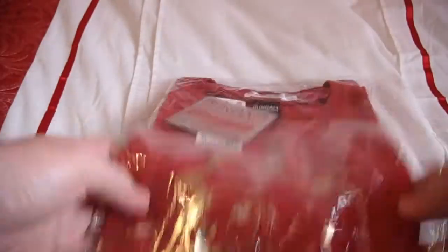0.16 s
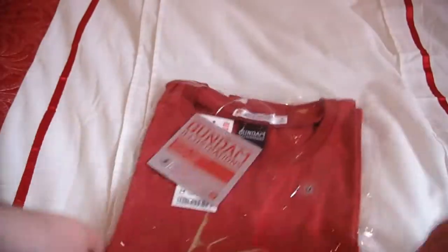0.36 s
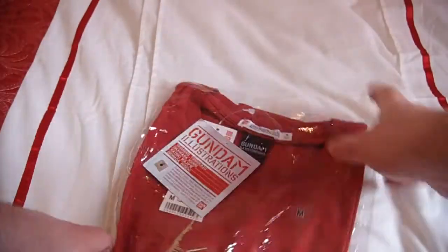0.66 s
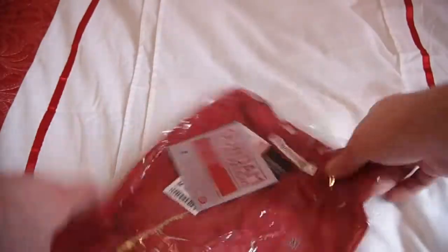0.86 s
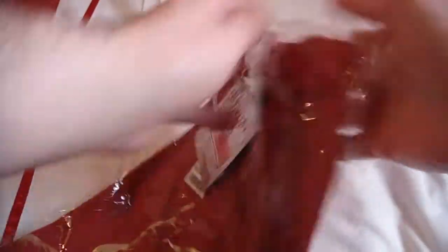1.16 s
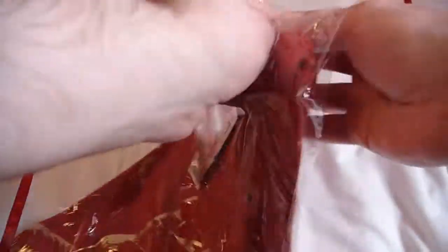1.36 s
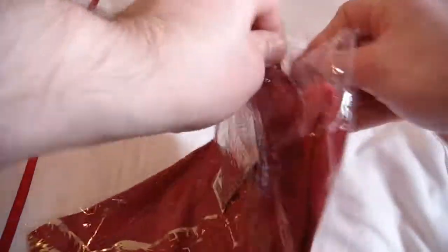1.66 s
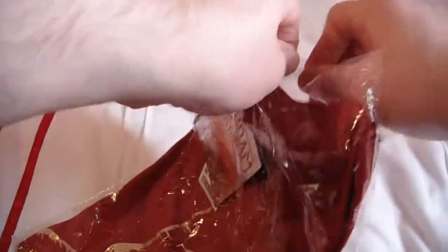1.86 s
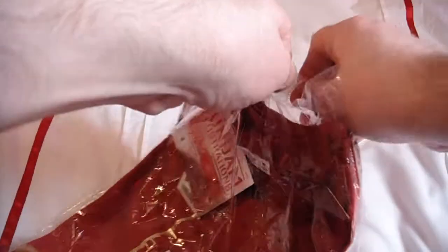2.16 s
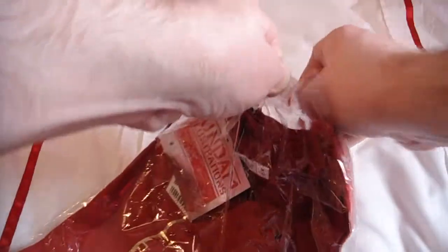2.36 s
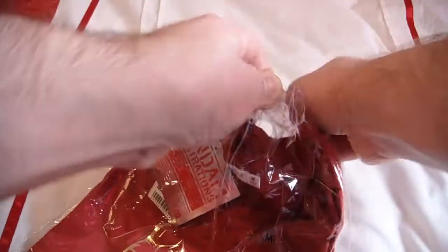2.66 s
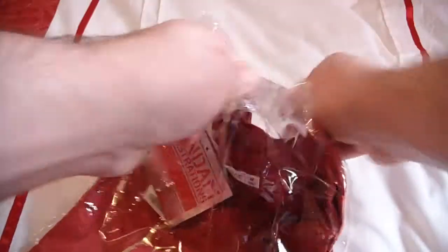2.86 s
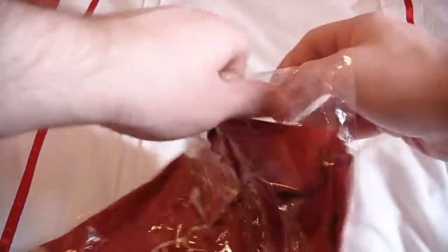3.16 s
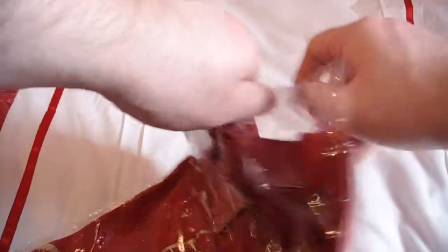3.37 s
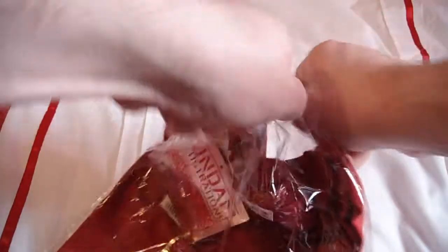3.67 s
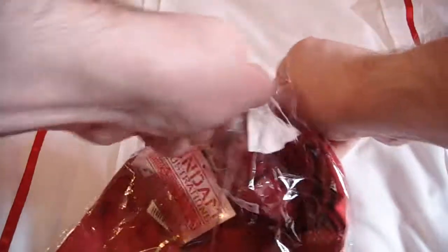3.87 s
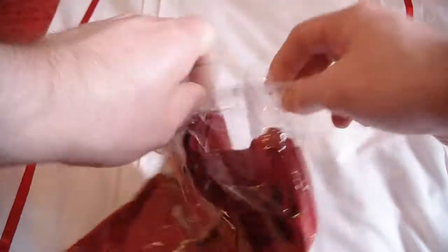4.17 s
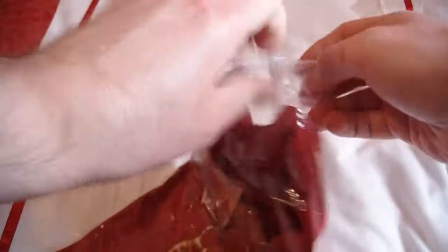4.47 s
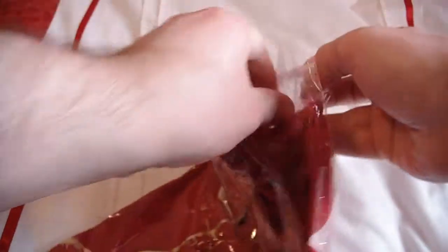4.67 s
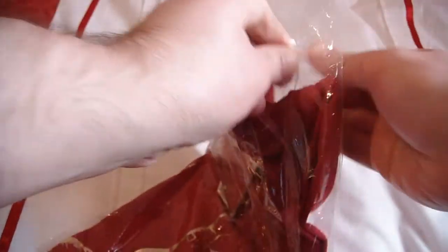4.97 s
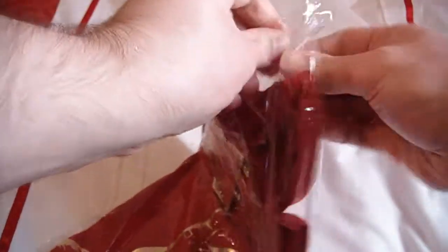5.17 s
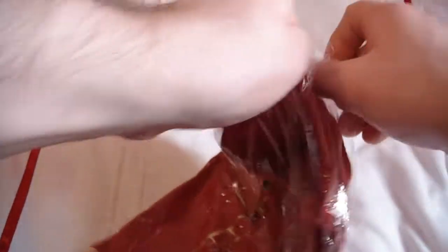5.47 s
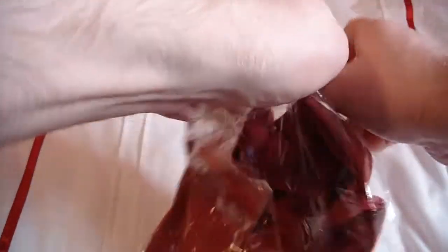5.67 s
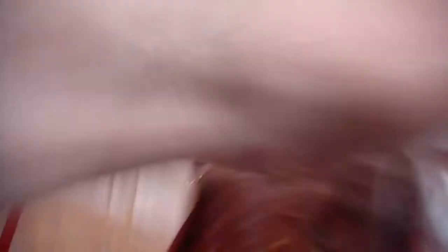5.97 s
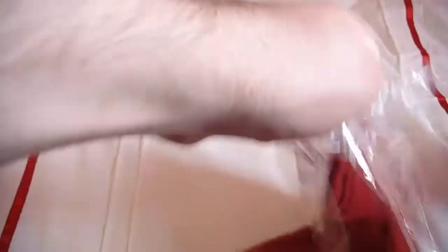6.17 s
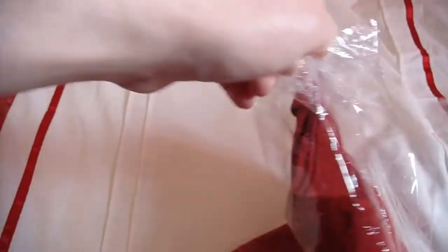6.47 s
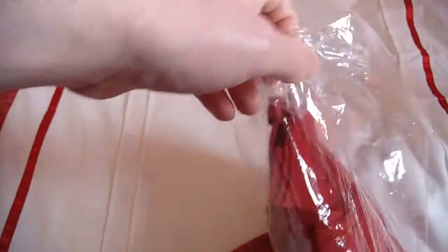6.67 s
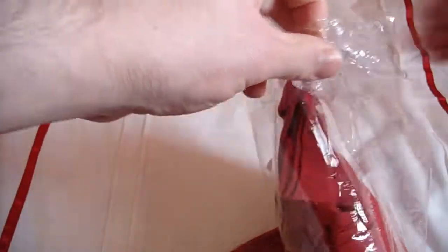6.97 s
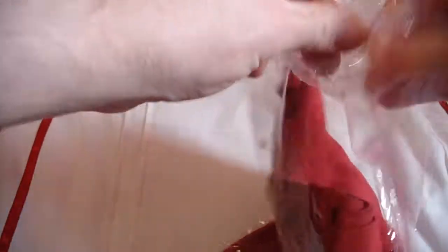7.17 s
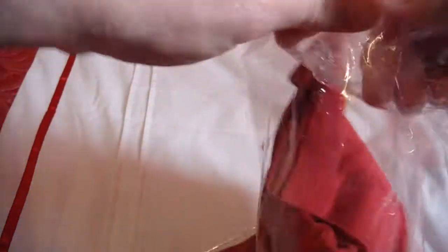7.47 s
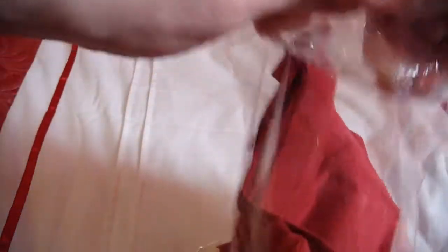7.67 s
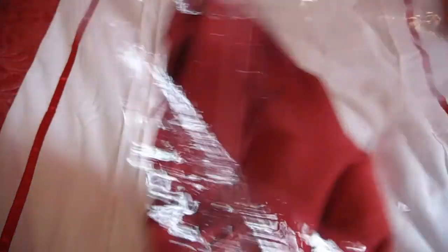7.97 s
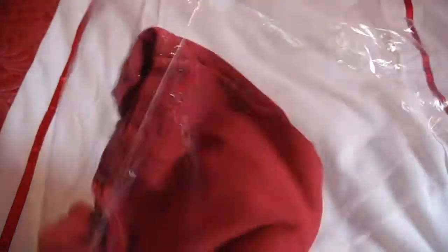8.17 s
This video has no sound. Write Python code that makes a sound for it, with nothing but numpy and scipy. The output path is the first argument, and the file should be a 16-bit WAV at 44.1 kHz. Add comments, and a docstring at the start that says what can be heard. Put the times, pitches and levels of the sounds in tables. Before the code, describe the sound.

Very close to a stereo microphone in a quiet, dampened room, hands work a thin plastic bag. Short pulls bring dense bright crackle over a sliding hiss, with sharp snaps between. Pops and crumpling knocks join in; the seam rips quickly near six seconds and again before eight, then the loose film rustles loudly with a faint puff of air.

```python
"""Two hands pull at a thin plastic bag on a bed, close to a small stereo microphone, in a quiet, dead room.
Creases buckle in dense clusters of tiny clicks, over a sliding hiss, with single sharp snaps standing out.
Each pull swells and lets go; bunched folds crumple in like-pitched knocks, slack panels flap softly or pop
with a sinking ring, tugs thump, and the seam rips twice in fast runs of breaks. A puff of air passes late on.
A short faint tail and a steady noise floor lie behind; the loudest peaks are flattened at full scale."""
import sys
import numpy as np
from scipy import signal
from scipy.fft import rfft, irfft, next_fast_len
from scipy.io import wavfile
from scipy.ndimage import uniform_filter1d, map_coordinates

SR = 44100
rng = np.random.default_rng(int(sys.argv[2]) if len(sys.argv) > 2 else 0)


def to_wav(s):
    """Save 16-bit WAV."""
    ch = np.atleast_2d(s).T  # columns
    pcm = np.round(np.clip(ch, -1, 1) * 32767)  # PCM
    wavfile.write(sys.argv[1], SR, pcm.astype(np.int16))


N = 366549  # samples

# spectra of the room's noise floor, sliding film, flapping panels and buckling film:
# (frequency [Hz], relative density [dB per Hz])
ROOM_SPECTRUM = [(70, -41.5), (14000, -41.5)]
SLIDE_SPECTRUM = [(200, -17), (780, -7), (1700, 3.5), (14000, -2)]
FLAP_SPECTRUM = [(25, -17.5), (115, -5), (170, -4.5), (250, 0.5), (480, 0), (780, -1), (1800, -1.5),
                 (4000, -45)]
FILM_SPECTRUM = [(130, -46.5), (780, 0), (940, -5), (1900, 0), (4800, 1.5), (9500, 2.5), (14000, 2)]
# tugs that jerk the whole sheet: (time [s], relative level [dB])
TUGS = [(6.298, -17), (6.774, -16.5)]
# bunched folds crumpling: (start [s], length [s], level [dB], middle pitch [Hz])
CRUMPLES = [(1.981, .2, -33, 1400), (4.52, 0.35, -31.5, 1850), (5.554, .1, -27.5, 1890),
            (7.051, 1.0, -30.5, 3440)]
# whole panels popping over: (time [s], starting level [dB], starting pitch [Hz])
POPS = [(.668, -19.5, 768), (0.7825, -8.5, 2100), (2.884, -16, 796), (2.982, -14.5, 800),
        (3.849, -15, 1380), (4.8158, -9.5, 1990), (5.1163, -1, 4270), (5.427, -18.5, 620),
        (5.728, -7.5, 2400), (5.871, -17, 740), (6.4904, -6, 2080), (6.5274, -18.5, 3700),
        (6.5936, -9.5, 6100), (6.9328, -3.5, 3290), (7.033, -23, 463)]
# the seam giving way: (start [s], length [s], relative starting level [dB], fall over the length [dB])
RIPS = [(5.9112, .048, -5, 16.5), (7.776, .024, -1, 32)]
# large single creases snapping through: (time [s], relative level [dB])
SNAPS = [(0.3606, -19), (0.449, -17), (0.48, -19), (0.547, -20), (.5582, -15.5), (0.6296, -14),
         (.9402, -20), (1.0797, -17), (1.3015, -10), (1.407, -10), (1.434, -15), (1.5267, -13),
         (1.5364, -17), (1.7294, -7), (1.7378, -15), (1.8044, -16), (1.8435, -11), (1.853, -12.5),
         (1.925, -15.5), (1.9483, -14.5), (1.9963, -14), (2.017, -29), (2.172, -9.5), (2.191, -14.5),
         (2.22, -18), (2.2487, -16.5), (2.2932, -18), (2.3119, -21.5), (2.3445, -15.5), (2.398, -25),
         (2.4075, -18.5), (2.5375, -6), (2.608, -12), (2.6172, -15.5), (2.7287, -11), (2.833, -13.5),
         (3.1846, -11), (3.197, -21), (3.255, -13), (3.659, -17.5), (3.666, -12), (4.1077, -12.5),
         (4.1366, -17.5), (4.46, -17.5), (4.6224, -17), (4.7412, -19), (5.1533, -13), (5.4443, -14.5),
         (5.6633, -13), (5.8502, -25), (6.2992, -16.5), (6.4383, -17.5), (6.4444, -15.5), (6.5023, -23),
         (6.709, -19), (6.7694, -19), (6.778, -17), (6.7934, -19), (6.9537, -16), (7.1987, -12),
         (7.299, -14), (7.3341, -8.5), (7.344, -10.5)]
# flapping panels under a pull, against the crinkle: (time [s], relative level [dB])
FLAPPING = [(5.1, -23), (5.3, -17.5), (6.05, -12), (6.5, -18), (7.6, -18.5), (7.9, -12.5)]
# how taut the fingers hold the film; taut film gives separate ticks: (time [s], tautness [dB])
TAUTNESS = [(.26, -7), (.42, 1), (1.19, -5), (1.3, 1), (2.45, 3), (3.0, -1), (6.6, 1), (7.05, -3.5),
            (7.9, -6)]
# light crinkle while the bag is only held: (time [s], relative level [dB])
HELD = [(.03, -50), (.18, -34), (.36, -31), (.47, -36), (.65, -31), (.73, -37), (1.0, -27), (2.15, -29),
        (2.3, -37), (2.45, -36), (2.9, -28), (3.7, -30), (6.15, -28), (6.25, -47), (6.3, -32.5),
        (6.88, -36), (7.1, -28), (8.31, -28)]
# separate pulls of the hands:
# (start [s], length [s], relative crinkle level [dB], brightness [dB per two octaves, roughly])
PULLS = [(0.251, .05, -21, 1.5), (.80, .16, -19, -0.5), (1.175, .065, -17.5, 0), (1.305, .05, -21, 0),
         (1.401, .07, -17.5, 2), (1.51, .36, -21, -1.5), (1.981, .2, -25, 0.5), (2.486, .025, -22.5, -7),
         (2.62, .26, -23.5, -0.5), (2.959, .09, -18.5, 0), (3.081, .22, -21.5, 0.5), (3.34, .05, -15, 0),
         (3.41, .14, -21, -0.5), (3.98, .04, -22, -1), (4.025, .03, -18, -2), (4.161, .18, -21.5, 0.5),
         (4.462, .44, -21.5, 1.5), (4.988, .06, -20, -4.5), (5.108, .10, -21.5, -2), (5.249, .07, -16, -3),
         (5.39, .28, -20, -1.5), (5.796, .11, -24, 8.5), (5.998, .06, -21, -1.5), (6.11, .07, -25, -6.5),
         (6.408, .03, -27, 1.5), (6.648, .06, -28, -4), (7.075, .135, -19.5, 2.5), (7.28, .21, -20.5, 4),
         (7.675, .095, -21, 2.5), (7.80, .23, -17.5, 3), (8.21, .04, -19.5, 3)]

ATTACK_S, RELEASE_S = .014, .02  # time constants of taking hold (at tautness 0 dB) and letting go
ATTACK_SLOWS = 2.1  # dB of slower attack per dB of slackness
SAG_DB = 1.5  # the film yields over the length of a pull
HELD_BRIGHT_DB, HELD_FLAP_DB = -4, -13.5  # colour and relative flap level of the held bag
TOP_HZ = 14250  # upper band limit


def amp(db):
    """Amplitude factor of a level in dB."""
    return 10 ** (np.asarray(db) / 20)


def unit(x):
    """x brought to rms 1."""
    return x / np.sqrt(np.mean(x ** 2) + 1e-20)


def curves(rows):
    """One value per sample for each column after the time."""
    times, *columns = np.transpose(rows)
    return [np.interp(np.arange(N) / SR, times, column) for column in columns]


def wobble(rate):
    """A smooth random curve, rate knots a second."""
    knots = rng.standard_normal(int(N * rate / SR) + 4)
    return map_coordinates(knots, [np.arange(N) * rate / SR])


def filtered(x, response):
    """x times a response of frequency."""
    m = next_fast_len(N + SR // 2)
    spectrum = rfft(x, m) * response(np.fft.rfftfreq(m, 1 / SR))
    return irfft(spectrum, m)[..., :N]


def coloured(x, points, size=2048):
    """x through a causal, minimum-phase filter of unit energy with the given (Hz, dB) shape."""
    hz, db = np.transpose(points)
    log_hz = np.log(np.fft.rfftfreq(size, 1 / SR) + 1)
    gain = amp(np.interp(log_hz, np.log(hz), db))
    # folding the cepstrum onto positive time gives minimum phase
    cepstrum = irfft(np.log(gain))
    cepstrum[1:size // 2] *= 2
    cepstrum[size // 2 + 1:] = 0
    kernel = irfft(np.exp(rfft(cepstrum)))
    return signal.fftconvolve(x, kernel[None] / np.linalg.norm(kernel), axes=1)[:, :N]


def placed(times, sounds):
    """Stereo sounds (2, events, samples) summed at their times."""
    starts = np.round(times * SR).astype(int)
    at = np.maximum((starts[:, None] + np.arange(sounds.shape[-1])).ravel(), 0)
    return np.array([np.bincount(at, side.ravel(), N)[:N] for side in sounds])


def moments(rate):
    """Random times that come at the given rate a second."""
    total = np.cumsum(rate) / SR
    draws = np.sort(rng.uniform(0, total[-1], int(total[-1])))
    return np.searchsorted(total, draws) / SR


def evened(x, span):
    """Clicks share the work that the hands put in over each span [s]: rms near 1 throughout."""
    power, width = np.mean(x ** 2, axis=0), max(int(span * SR), 2)
    smooth = uniform_filter1d(uniform_filter1d(power, width), width)
    return x / np.sqrt(np.abs(smooth) + 1e-9)


def hiss(spectrum, apart_hz=16000):
    """Stereo noise of rms 1, alike at both ports in the bass and less so in the treble."""
    a, b = rng.standard_normal((2, N))
    apart = filtered(b, lambda hz: np.minimum(hz / apart_hz, 1))
    return unit(coloured(np.array([a + apart, a - apart]), spectrum))


def room_tone(level_db=-42.0):
    """The steady noise floor of the quiet room."""
    return amp(level_db) * hiss(ROOM_SPECTRUM)


def room(x, t60=0.4, wet_db=-15):
    """Bedding swallows most of the sound; a short faint tail is left."""
    t = np.arange(SR // 4) / SR
    tail = hiss(SLIDE_SPECTRUM)[:, :len(t)] * amp(-60 * t / t60) * (t > .003)
    return amp(wet_db) * signal.fftconvolve(x, tail / np.linalg.norm(tail[0]), axes=1)[:, :N]


def waft(s=7.9, width=0.1, db=-37):
    """The opened bag is swept past the microphone and pushes a puff of air at it."""
    swell = np.exp(-((np.arange(N) / SR - s) / width) ** 2 / 2)
    return amp(db) * swell * hiss([(45, 4), (130, 8.0), (400, -40)], apart_hz=151)


def tugs(push_hz=100, t60=0.0043, level_db=3):
    """A tug pushes the air once with the whole sheet: a low, heavily damped thump."""
    times, db = np.transpose(TUGS)
    t = np.arange(SR // 10) / SR
    push = amp(db[:, None] + level_db - 60 * t / t60) * np.sin(2 * np.pi * push_hz * t)
    return placed(times, np.array([push, push]))


def facets(count, middle_hz, spread):
    """Facets come in many sizes, hence many pitches."""
    return middle_hz * np.exp(spread * rng.standard_normal(count))


def buckles(facet_hz, bright_db, t60, facet_db=7, sharpness=3, flip=0.81, port_hz=4200,
            apart=0.2, bearing=0.022, size=320):
    """Stereo clicks of unit energy: a crease flips, its facet rings and the sheet around it shivers."""
    count, t, hz = len(facet_hz), np.arange(size) / SR, np.fft.rfftfreq(size, 1 / SR)
    life, sign, place = rng.standard_normal((3, count, 1))
    fade = amp(-60 * t / (t60 * np.exp(0.31 * life)))
    fade = fade / np.linalg.norm(fade, axis=1, keepdims=True)
    shiver = rfft(rng.standard_normal((2, count, size)) * fade)
    # the shiver comes from all over the sheet, so its treble differs between the two ports
    treble = np.tanh((hz / port_hz) ** 3)
    turn = apart * treble
    ports = np.array([1, -1])[:, None, None]
    click = flip * np.sign(sign) + np.cos(turn) * shiver[0] + ports * np.sin(turn) * shiver[1]
    # each crease lies in its own direction and reaches one port first
    click = click * np.exp(1j * ports * bearing * place * treble)
    # the facet is one damped resonance; tension tilts the whole click towards the treble
    centre = facet_hz[:, None]
    band = 1j * hz * centre / sharpness
    ring = 1 + amp(facet_db) * band / (centre ** 2 - hz ** 2 + band)
    tilt = amp(np.reshape(bright_db, (-1, 1)) * np.log(hz + 800) / np.log(4))
    sound = np.roll(irfft(click * (ring * tilt)), 10, axis=-1)  # 10 samples of space ahead of the flip
    energy = np.sum(sound ** 2, axis=-1).mean(axis=0)
    return sound / np.sqrt(energy)[:, None]


def crumples(rate=110, spread=0.16, uneven_db=6, facet_db=26, sharpness=6):
    """The facets of one fold are of like size, so they flip with short knocks near one pitch."""
    out = np.zeros((2, N))
    for s, length, db, hz in CRUMPLES:
        count = int(rate * length) + 1
        times = s + length * (np.arange(count) + rng.uniform(0, 1, count)) / count
        sizes = unit(amp(uneven_db * rng.uniform(-1.4, 1, count)))
        sizes = sizes * amp(db) * np.sqrt(length * SR / count)
        knocks = buckles(facets(count, hz, spread), 0, t60=0.004, facet_db=facet_db, sharpness=sharpness)
        out += placed(times, knocks * sizes[:, None])
    return out


def flaps(flap_db, rate=370, spread_db=6.0, near_hz=170):
    """Wide slack panels flip with soft, hollow pats; so close, their bass differs between the ports."""
    times = moments(np.full(N, rate))
    count = len(times)
    pats = buckles(facets(count, 1065, 0.619), 0, t60=0.01, facet_db=9.5, sharpness=14.8, size=512)
    sizes = amp(spread_db * np.minimum(rng.standard_normal(count), 1.6))
    both = placed(times, pats * sizes[:, None])
    # each pat pushes a little more air at one port than at the other
    lopsided = placed(times, pats * (sizes * rng.standard_normal(count))[:, None])[0]
    apart = filtered(lopsided, lambda hz: .5 / (1 + hz / near_hz))
    panels = coloured(both + np.array([apart, -apart]), FLAP_SPECTRUM)
    return amp(flap_db) * evened(panels, span=0.13)


def pops(ring_cycles=13, glide=0.088):
    """A panel flips and rings for a few cycles, its pitch sinking as it goes slack."""
    times, db, hz = np.transpose(POPS)
    age = np.arange(SR // 10) / SR * hz[:, None] / ring_cycles  # 1 when the ring is 60 dB down
    cycles = hz[:, None] * np.cumsum(1 - glide * np.minimum(age, 1), axis=1) / SR
    knock = amp(db[:, None] - 60 * age) * np.sin(2 * np.pi * cycles)
    return placed(times, np.array([knock, knock]))


def rips(count=170, jerk_db=-6, lead=0.4, fray_db=-11):
    """The seam frays, then gives way in a run of breaks dying ever faster with the tension, jerking panels."""
    out = np.zeros((2, N))
    for s, length, db, fall_db in RIPS:
        # position along the rip: below 0 while it frays, 1 at its end
        along = (1 + lead) * (np.arange(count) + rng.uniform(0, 1, count)) / count - lead
        fray, fall = fray_db + fall_db * along, -fall_db * along * (1 + along) / 2
        shape_db = np.where(along < 0, fray, fall)
        sizes = amp(db + shape_db + 2 * rng.standard_normal(count))
        sizes = sizes * np.sqrt((1 + lead) * length * SR / count)
        breaks = buckles(facets(count, 4450, 0.57), 0, t60=0.0016)
        out += placed(s + length * along, breaks * sizes[:, None])
    return coloured(out, FILM_SPECTRUM) + amp(jerk_db) * coloured(out, FLAP_SPECTRUM)


def snaps(level_db=6.5, rebound_s=0.0016, rebound_db=-8, pop_click_db=-9):
    """Large creases let go singly, each with its own colour, and rebound at once; popping panels click too."""
    pop_clicks = [(s, db + pop_click_db) for s, db, _ in POPS]
    times, db = np.transpose(SNAPS + pop_clicks)
    count = len(times)

    def clicks():
        sounds = buckles(facets(count, 6530, 0.5), 0, t60=0.005, facet_db=5.0, flip=0.79)
        return sounds * amp(db + level_db)[:, None]

    first = placed(times - 10 / SR, clicks())
    rebound = placed(times + rebound_s * rng.uniform(.5, 2, count), clicks())
    both = first + amp(rebound_db) * rebound
    return coloured(both * np.sqrt(SR / 10 ** 3), FILM_SPECTRUM)  # levels count as rms over 1 ms


def handling(taut_db):
    """Crinkle level, brightness and flap level [dB]: pulls add to the held bag, the stronger weighing more."""
    t = np.arange(N) / SR
    held = amp(curves(HELD)[0]) ** 2
    power, bright = held.copy(), held * HELD_BRIGHT_DB
    for s, length, db, bright_db in PULLS:
        near = slice(max(int((s - .2) * SR), 0), int((s + length + .2) * SR))
        u = t[near] - s
        attack = ATTACK_S * amp(-ATTACK_SLOWS * taut_db[int(s * SR)])
        shape = np.exp(np.minimum(u, 0) / attack - np.maximum(u - length, 0) / RELEASE_S)
        sag_db = SAG_DB * (np.clip(u / length, 0, 1) - .5)
        pull = (shape * amp(db - sag_db)) ** 2
        power[near] += pull
        bright[near] += pull * bright_db
    flap = held * HELD_FLAP_DB + (power - held) * curves(FLAPPING)[0]
    return 10 * np.log10(power), bright / power, flap / power


def rustle(work_db, level_db=-3.5, uneven_db=5.0, grain_db=5):
    """Film sliding over cloth catches and slips: a fine-grained, slightly uneven hiss."""
    catching = amp(uneven_db * wobble(160) + grain_db * wobble(1400))
    return amp(work_db + level_db) * unit(catching * hiss(SLIDE_SPECTRUM))


def ticks(work_db, taut_db, tension_db, rate=80, level_db=-11.0, follow=0.72, range_db=11,
          bright_db=3, pitch_follows=0.92):
    """Middling creases let go in turn: faster on taut film, louder under hard pulls, lower where slack."""
    total = np.cumsum(rate * amp(taut_db)) / SR
    turns = np.arange(int(total[-1]))
    at = np.searchsorted(total, turns + rng.uniform(0, 2, len(turns)))
    at = np.minimum(at, N - 1)
    db = level_db + follow * (work_db - work_db.mean())[at] - range_db * rng.uniform(0, 1, len(at))
    facet_hz = facets(len(at), 6450, 0.62) * amp(pitch_follows * tension_db[at])
    # higher-pitched facets are brighter too
    clicks = buckles(facet_hz, bright_db * np.log(facet_hz / 2600), t60=0.0058, facet_db=3.5)
    sizes = amp(db)[:, None] * np.sqrt(SR / 10 ** 3)
    return coloured(placed(at / SR, clicks * sizes), FILM_SPECTRUM)


def crinkle(work_db, bright_db, taut_db, rate=900, spread_db=5.0, thins=0.8):
    """Harder work buckles more creases; taut film gives fewer, more separate clicks."""
    times = moments(np.clip(rate * amp(work_db + 21 - thins * taut_db), 130, 3000))
    at = np.minimum((times * SR).astype(int), N - 1)
    count = len(at)
    sizes = amp(spread_db * np.minimum(rng.standard_normal(count), 1.6))
    click_bright_db = bright_db[at] + 2 * rng.standard_normal(count)
    clicks = buckles(facets(count, 6500, 0.86), click_bright_db, t60=0.012, facet_db=4.0)
    film = coloured(placed(times, clicks * sizes[:, None]), FILM_SPECTRUM)
    return amp(work_db) * evened(film, span=0.075)


def scene(sliding_db=-8, thinning=0.5, crinkle_db=-1):
    """The bag close by, its room and the faint noise floor."""
    taut_db, = curves(TAUTNESS)
    work_db, bright_db, flap_db = handling(taut_db)
    dense_db = work_db + crinkle_db - thinning * taut_db
    # a slack sheet that moves fast slides and hisses, a taut or slow one mostly crackles
    crackling = amp(sliding_db + taut_db - flap_db - (work_db + 18.0))
    slide = np.clip(1 / (1 + crackling), 0, .85)
    film = np.sqrt(1 - slide) * crinkle(dense_db, bright_db, taut_db)
    film = film + np.sqrt(slide) * rustle(dense_db) + ticks(work_db, taut_db, bright_db)
    bag = film + crumples() + snaps() + rips() + flaps(work_db + flap_db) + tugs() + pops()
    return bag + room(bag) + waft() + room_tone()


def record(dry, lean_db=3, air_db=5.0):
    """The microphone lifts the top treble, later and louder at left; peaks flatten at full scale."""
    ports = np.array([[1], [-1]])  # left, right

    def microphone(hz):
        treble = (hz / TOP_HZ) ** 2
        phase = np.exp(-1j * ports * 2.6 * treble / 2)
        lean = ports * lean_db * np.tanh(2 * treble) / 2
        air = air_db * np.minimum(treble, 1) ** 2
        return (hz < TOP_HZ) * phase * amp(lean + air)

    heard = filtered(dry, microphone)
    flattened = heard / (1 + heard ** 10) ** (1 / 10)
    return filtered(flattened, lambda hz: hz < TOP_HZ)


dry = scene()
out = record(dry)
to_wav(out)
```